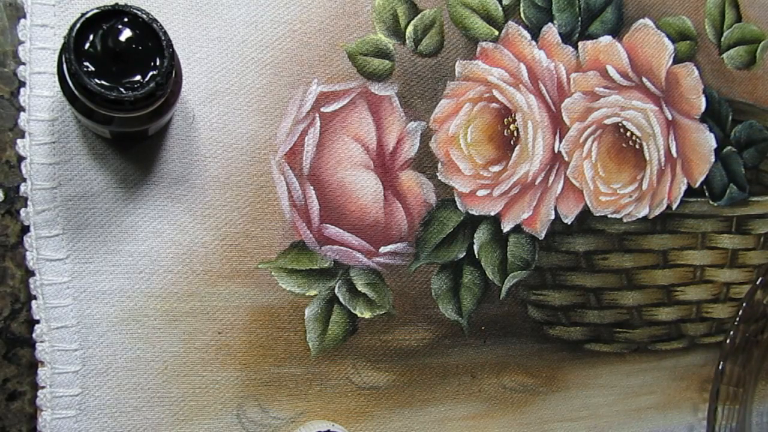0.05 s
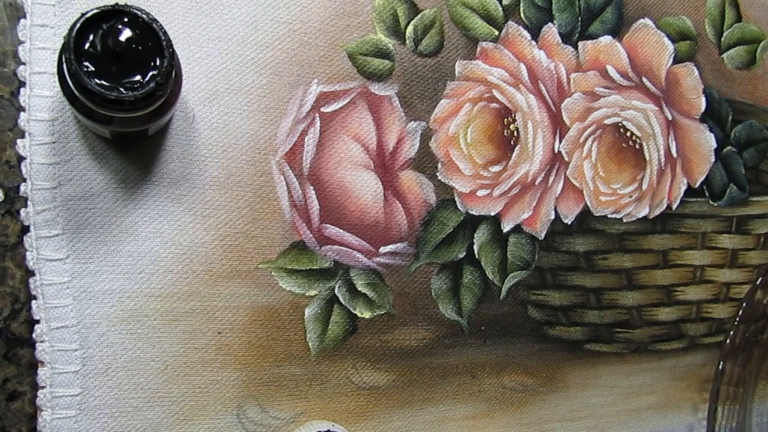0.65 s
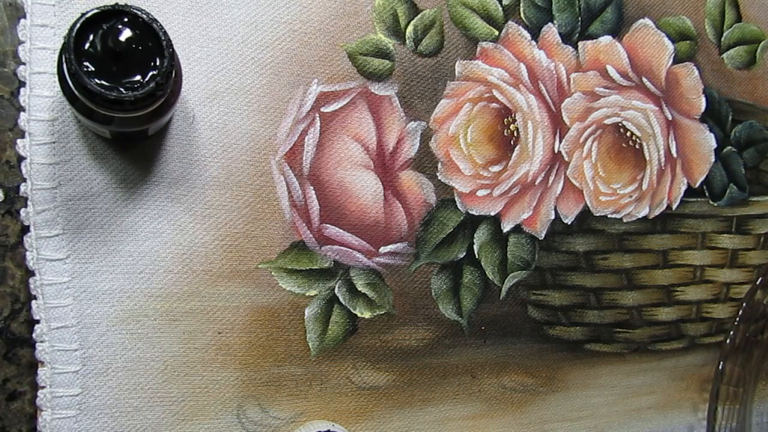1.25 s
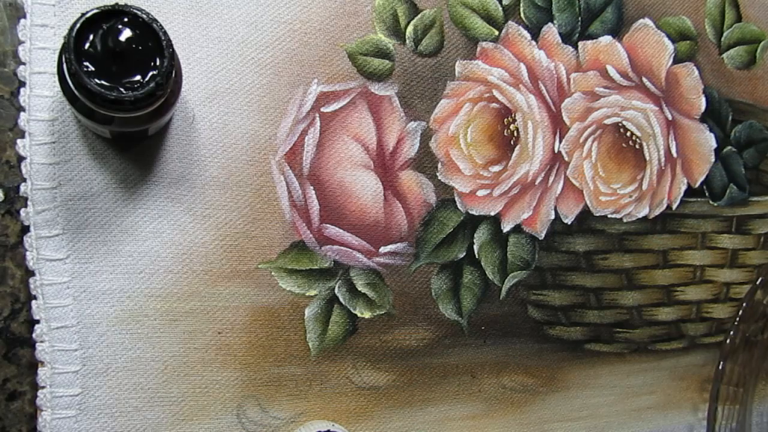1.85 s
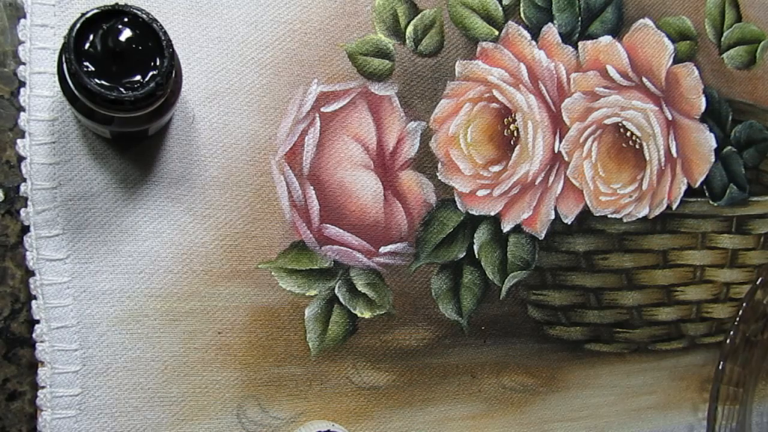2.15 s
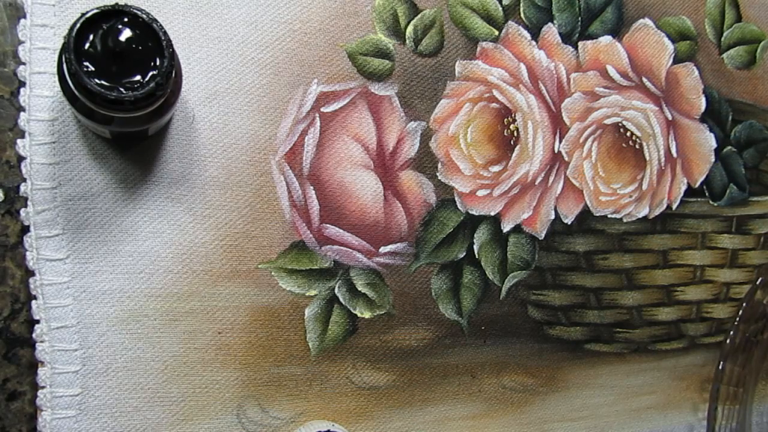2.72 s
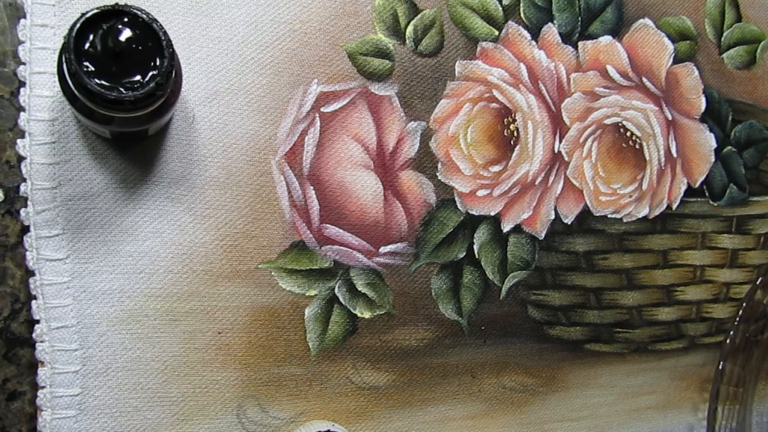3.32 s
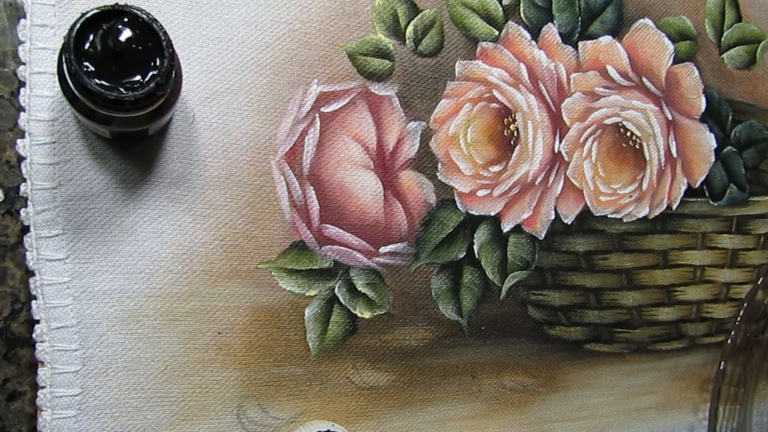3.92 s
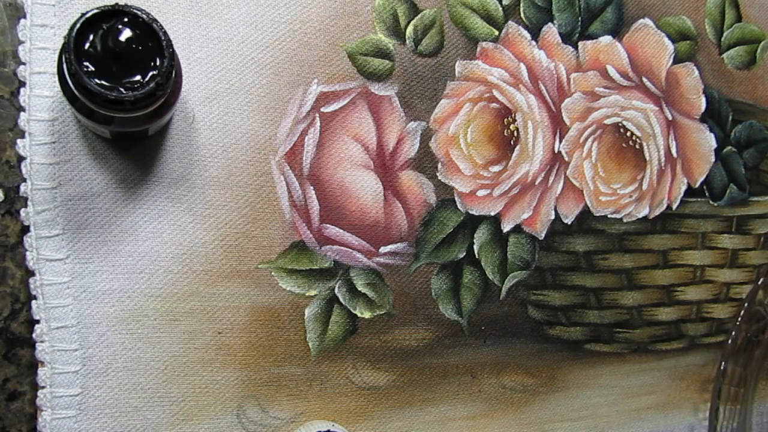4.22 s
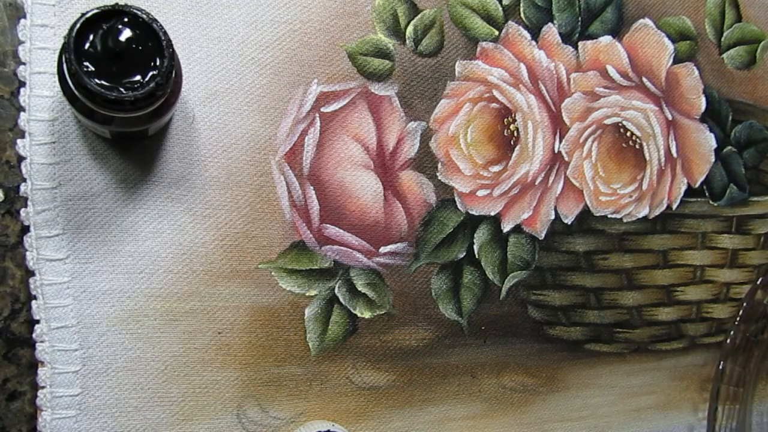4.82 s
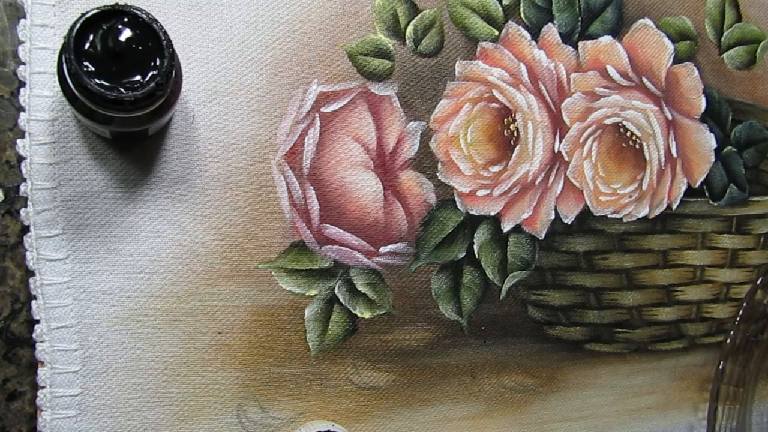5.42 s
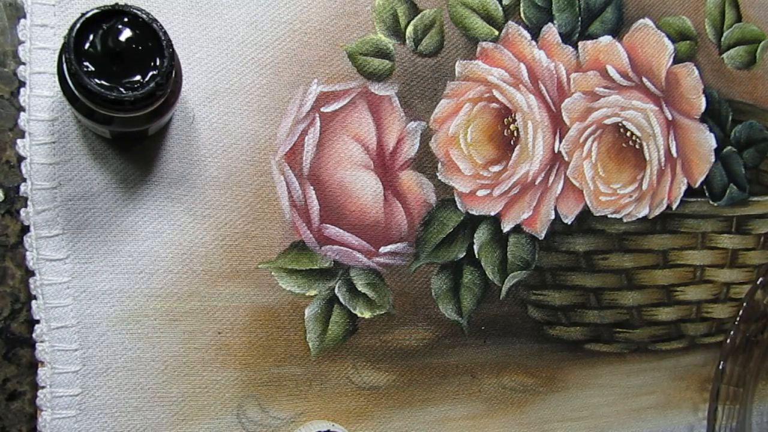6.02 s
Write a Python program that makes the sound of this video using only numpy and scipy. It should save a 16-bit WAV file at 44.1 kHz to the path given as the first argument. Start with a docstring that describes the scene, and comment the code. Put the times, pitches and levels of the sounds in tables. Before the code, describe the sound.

In a small, bare room, a paint jar scrapes softly over cloth. A brush handle knocks, then the plastic jar and lid clatter and snap against the table, and the lid is set down. Light ticks and faint, squeaky bristle strokes follow, before a seal opens with a small hollow pop. The handling sounds close, with a short echo, over low rumble, faint hum and a distant insect.

```python
"""Paint jar and brush handled on a table in a small, bare room. Throughout: low rumble, faint hum, a distant
insect. The jar scrapes over cloth, the brush ticks on it; a faint low tone swells and fades. The brush handle
knocks; plastic jar and lid clatter and snap, thudding on the table; a second jar is set down. One more shove,
light ticks, then bristles rub and squeak. Last, a seal parts with a small hollow pop, and one tick follows.
Each blow rings the modes of the struck object; the walls echo all handling."""
import sys
import numpy as np
from scipy import signal
from scipy.fft import rfft, irfft, next_fast_len
from scipy.io import wavfile
from scipy.ndimage import uniform_filter1d

SR = 44100
rng = np.random.default_rng(int(sys.argv[2]) if len(sys.argv) > 2 else 0)


def store_pcm(level_fs):
    """Save levels as 16-bit WAV."""
    pcm = np.round(np.clip(level_fs, -1, 1) * 32767).astype(np.int16)
    wavfile.write(sys.argv[1], SR, np.atleast_2d(pcm).T)


N = 271656
TIME_S = np.arange(N) / SR
LEVEL_WINDOW_S = .005  # blow and pop levels: rms with all energy in this window

# room noise: (frequency [Hz], mid density [dB/Hz], side density [dB/Hz])
RUMBLE_SPECTRUM = [(25, -99, -85), (40.8, -87.5, -91.5), (62.4, -80.5, -69.5), (199, -77.5, -69.5),
                   (323, -83, -74), (541, -84.5, -79), (680, -100, -104), (762, -89.5, -87),
                   (1130, -91, -88), (2460, -101, -102), (3830, -105, -107), (7250, -105, -105),
                   (13000, -108, -106), (16700, -111, -106)]
# hum: (frequency [Hz], level [dB])
HUM_TONES = [(59.5, -69), (375, -66.5), (506, -69), (571, -71)]

# jar shoved over cloth: (peak time [s], rise [s], fall [s], scrape [dB], body [dB])
JAR_SHOVES = [(.04, 0.21, 0.28, -58.5, -84), (.22, 0.12, .13, -56, -82), (.41, 0.23, .16, -61.5, -82),
              (.645, 0.076, 0.33, -56, -78), (.745, .06, 0.034, -56, -50), (.772, 0.042, 0.063, -53, -45.5),
              (2.385, 0.066, 0.054, -50, -78), (3.085, .11, 0.065, -78, -54)]
# rubbed jar and squeaking bristles: (frequency [Hz], width [Hz], gain [dB])
JAR_BODY_PEAKS = [(1125, 55, 1), (1440, 160, 6.5), (1890, 510, -5), (3800, 340, -3.5)]
SQUEAK_OUT_PEAKS = [(2048, 20, 3), (3300, 36, -7), (4140, 32, -2), (5040, 53, 0), (6340, 91, -8),
                    (6940, 57, -3.5)]
SQUEAK_BACK_PEAKS = [(3330, 26, 15), (5500, 190, -24)]
# friction and echo spectra: (frequency [Hz], gain [dB])
SCRAPE_SPECTRUM = [(500, -38), (1200, 0), (4500, 3.5), (7000, 1), (10000, 0), (16000, -6.5)]
BRISTLE_SPECTRUM = [(2000, -25), (5000, -11), (8000, -7.5), (10500, -1.5), (12500, -6), (13500, -7),
                    (16000, -9)]
WALL_SPECTRUM = [(100, -9.5), (350, 3.5), (680, -7), (900, 6), (1500, 0.5), (3500, -4.5), (6500, -5),
                 (10000, -5), (16000, -4.5)]
# echo decay: (frequency [Hz], T60 [s])
WALL_DECAY = [(200, 0.51), (1700, 0.56), (4000, 0.53), (8000, 0.44), (16000, 0.28)]
# stereo width of the handling: (frequency [Hz], side gain [dB])
SIDE_SPECTRUM = [(100, 7), (380, -17), (700, -17), (1300, -10), (2400, -23), (4400, -13.5), (8100, -6),
                 (11000, -5), (13500, -1)]

# blows: (time [s], level [dB], contact [s], low shelf [dB], treble edge [Hz], room send [dB])
BRUSH_TICKS = [(.2375, -48.5, 0.0021, 24, 8000, -1.5), (.3765, -47.5, 0.00087, 10, 15000, -5),
               (.775, -43, 0.0029, 21, 14000, -1.5), (3.0085, -53, 0.0018, 0, 9000, -4),
               (3.078, -52, 0.001, -7, 9250, -5), (3.1415, -53.5, 0.0025, 3, 8000, 3),
               (3.336, -61, .002, -2, 14000, 6), (4.565, -57, .003, -11, 15000, -3),
               (5.607, -58, .003, 3, 12000, -5)]
HANDLE_KNOCKS = [(1.4312, -26, 0.0015, -3, 4040, -3.5), (1.5925, -36.5, 0.0015, -6, 9800, 0),
                 (1.6395, -31.5, 0.0014, -4, 11300, 0.5), (1.9135, -40.5, 0.0016, 9, 4430, 0.5),
                 (1.9555, -36, .003, 6, 4400, -4.5)]
JAR_CLICKS = [(1.8935, -27.5, 0.0033, 1.5, 12000, 1), (1.903, -27.5, 0.0018, -6, 6370, -24),
              (1.9133, -20, 0.0021, 0.5, 12100, -2), (1.9312, -34, 0.0014, -13, 13000, -4),
              (1.9348, -22.5, 0.0031, -5.5, 10000, 0.5), (1.9475, -27, .0006, -23, 8050, -9),
              (2.3921, -15.5, 0.0018, -8, 14600, -0.5), (2.410, -26.5, 0.0038, -5, 13000, -10),
              (2.4197, -26.5, 0.0044, -1, 8100, -1.5), (2.7435, -45.5, 0.00064, -22, 7900, -1.5),
              (2.7765, -53, .001, -7, 9400, 2)]
SECOND_JAR_SET_DOWN = [(2.5985, -26.5, 0.0031, -2, 14700, 1)]
# modes of struck objects: (frequency [Hz], relative energy [dB], T60 [s])
JAR_MODES = [(850, -11.5, 0.067), (1250, -9, .014), (1600, -13.5, 0.0058), (2260, -24, 0.012),
             (3470, -10, 0.022), (5600, -5, 0.0088), (6700, 0, 0.026), (6930, -4.5, 0.013),
             (8470, -1, 0.011), (7770, -5.5, 0.014), (9300, 0.5, 0.0051), (9850, 2.5, 0.01),
             (10390, 5.5, 0.012), (12300, -11, 0.0055), (14200, -11, 0.0062)]
HANDLE_MODES = [(527, -8.5, 0.064), (1027, -0.5, 0.055), (1320, 3, 0.068), (1610, -7.5, 0.021),
                (1930, -5, 0.0083), (1990, -11, 0.016), (2170, -6.5, .008), (3210, -10.5, 0.015),
                (4370, -8, 0.021), (6800, -14, 0.0081), (9840, -8.5, .004)]
TABLE_MODES = [(110, -5.5, 0.032), (168, -5.5, 0.036), (266, -2.5, 0.025), (348, -1, 0.051),
               (486, -6, 0.028), (828, -1.5, 0.051)]
SECOND_JAR_MODES = [(845, 4.5, 0.046), (1240, -0.5, 0.017), (1813, 5, 0.04), (2050, -4, 0.015),
                    (2700, -14, 0.0095), (3300, -8, 0.032), (4770, -12, 0.0092), (6200, -2, 0.015),
                    (8400, -8, 0.016), (10240, 2, 0.015), (12600, -7, .01)]
# onset cracks: (frequency [Hz], gain [dB])
JAR_CRACK_SPECTRUM = [(150, -9), (700, -7), (1500, -1.5), (2600, -2), (4200, -4.5), (6500, 0.5),
                      (10500, 2.5), (13000, 1.5), (16000, -19)]
HANDLE_CRACK_SPECTRUM = [(300, -36), (700, -2), (1050, -3), (2000, 2.5), (2800, -2), (5000, -2),
                         (10000, -10), (16000, -16)]
SECOND_JAR_CRACK_SPECTRUM = [(200, -11), (800, -7), (2200, 4), (4000, -6.5), (7000, -2), (11000, -6.5),
                             (16000, -14)]
SEAL_CRACK_SPECTRUM = [(600, -55), (1100, -28), (1350, 7), (2200, -2.5), (2700, -13.5), (3500, -4.5),
                       (4200, 2), (4800, -9.5), (5300, 0), (6000, -11.5), (9000, -13), (16000, -28)]
# jar's weight landing on the table: (time [s], peak [dB])
TABLE_THUDS = [(1.9132, -41), (1.935, -40), (2.3938, -37.5), (2.419, -38)]

# brush strokes: (start [s], hold [s], release [s], hiss [dB], squeak re hiss [dB], direction)
BRUSH_STROKES = [(3.724, 0.038, .04, -56.5, -1.5, "out"), (3.826, 0.1, 0.53, -56.5, -5, "out"),
                 (4.22, 0.061, .28, -57.5, -7, "back")]
# bristle tufts springing free: (time [s], level [dB])
TUFT_FLICKS = [(3.807, -53), (3.875, -51.5), (3.93, -46), (3.9752, -44.5), (4.038, -54), (4.125, -51),
               (4.174, -52), (4.41, -60)]


def undb(db):
    """Decibels to gain."""
    return 10 ** (np.asarray(db) / 20)


def unit(x):
    """Scale each channel to rms 1."""
    return x / np.sqrt(np.mean(x ** 2, axis=-1, keepdims=True))


def curve_at(points, hz):
    """Interpolate (frequency [Hz], value) points over log frequency."""
    points_hz, values = np.transpose(points)
    return np.interp(np.log(hz + 1), np.log(points_hz), values)


def colour(x, spectrum):
    """Minimum-phase filter through (frequency [Hz], gain [dB]) points."""
    size = next_fast_len(x.shape[-1] // 2 + 2048) * 2
    gain = undb(curve_at(spectrum, np.fft.rfftfreq(size, 1 / SR)))
    cepstrum = irfft(np.log(gain))
    cepstrum[1:size // 2] *= 2
    cepstrum[size // 2 + 1:] = 0
    return irfft(rfft(x, size) * np.exp(rfft(cepstrum)))[..., :x.shape[-1]]


def resonate(x, peaks):
    """Parallel resonators; rms 1."""
    return unit(sum(undb(db) * signal.lfilter(*signal.iirpeak(hz, hz / width_hz, fs=SR), x)
                    for hz, width_hz, db in peaks))


def drift(rate_hz):
    """Smooth random drift, spread near 1."""
    step = int(SR / rate_hz)
    stairs = np.repeat(rng.standard_normal(N // step + 1), step)
    return 1.222 * uniform_filter1d(stairs, step)[:N]


def sine(hz):
    """Sine following a per-sample frequency."""
    return np.sin(2 * np.pi * np.cumsum(hz) / SR)


def swell(peak_s, rise_s, hold_s, fall_s):
    """Gain reaching 1 at peak_s; rise and fall are times per 20 dB."""
    before = np.maximum(peak_s - TIME_S, 0) / rise_s
    after = np.maximum(TIME_S - peak_s - hold_s, 0) / fall_s
    return undb(-20 * (before + after))


def add(track, time_s, sound):
    """Mix a sound in at time_s."""
    start = int(time_s * SR)
    track[..., start:start + sound.shape[-1]] += sound[..., :N - start]


def room_tone():
    """Steady low rumble and faint wavering hum; mid, side."""
    spectrum = np.array(RUMBLE_SPECTRUM)
    out = np.array([colour(rng.standard_normal(N), spectrum[:, [0, k]]) for k in (1, 2)])
    out *= np.sqrt(SR / 2)
    out[0] += sum(undb(db + 2 * drift(4.3)) * unit(sine(hz + 2.48 * drift(9))) for hz, db in HUM_TONES)
    return out


def insect(hz, width_hz, level_db, chirp_hz, depth_db, side_db):
    """Distant insect: uneven chirps, blurred on the way to a noise band; mid, side."""
    band = [(hz, width_hz, 0)]
    rasp = resonate(resonate(rng.standard_normal((2, N)), band), band)
    beat = sine(chirp_hz * (1 + .15 * drift(5)))
    chirps = unit(undb(depth_db * beat + 0.84 * drift(10)))
    return rasp * chirps * undb([[level_db], [level_db + side_db]])


def friction(rate_hz, spread_db):
    """Dense tiny slips of uneven size; mid, side."""
    slips = (rng.random((2, N)) < rate_hz / SR) * rng.standard_normal((2, N))
    size_db = spread_db * np.minimum(rng.exponential(size=N), 5)
    return unit(slips * undb(size_db))


def jar_slide(room_db):
    """Jar scrapes over cloth; pressed harder, its body sounds too. Returns direct, room send."""
    slips = friction(rate_hz=7700, spread_db=2.5)
    scrape = unit(colour(slips, SCRAPE_SPECTRUM))
    body = resonate(slips, JAR_BODY_PEAKS)
    out = sum(swell(peak_s, rise_s, 0, fall_s) * (undb(scrape_db) * scrape + undb(body_db) * body)
              for peak_s, rise_s, fall_s, scrape_db, body_db in JAR_SHOVES)
    return out, undb(room_db) * out[0]


def wall_echoes(send, first_s, build_s, size=32768):
    """Echoes build after the first reflection and decay, treble first; mid, side."""
    t, hz = np.arange(size) / SR, np.fft.rfftfreq(size, 1 / SR)
    noise_bins = rfft(rng.standard_normal((2, size)))
    centres_hz = np.geomspace(200, 16000, 8)
    tail = 0
    for centre_hz, weights in zip(centres_hz, np.eye(len(centres_hz))):
        band = irfft(noise_bins * curve_at(np.c_[centres_hz, weights], hz))
        tail = tail + band * np.exp(-np.log(1000) * t / curve_at(WALL_DECAY, centre_hz))
    tail *= 1 - np.exp(-np.maximum(t - first_s, 0) / build_s)
    tail = colour(tail / np.linalg.norm(tail[0]), WALL_SPECTRUM)
    return signal.fftconvolve(send[None], tail, axes=1)[:, :N]


def ring(modes, t, detune=0):
    """Decaying modes, weighted by energy; neighbours alternate in sign."""
    return sum((-1) ** k * undb(db) / np.sqrt(t60_s) * np.exp(-np.log(1000) * t / t60_s)
               * np.sin(2 * np.pi * hz * (1 + detune * rng.standard_normal()) * t)
               for k, (hz, db, t60_s) in enumerate(modes))


def blows(events, modes, crack_spectrum, chatter, crack_db, scatter_db, split_hz, size=4096):
    """A push and brief contact chatter ring the modes, with a crack. Returns direct, room send."""
    direct, send, t = np.zeros((2, N)), np.zeros(N), np.arange(size) / SR
    push = signal.unit_impulse(size)
    for time_s, level_db, contact_s, low_db, edge_hz, room_db in events:
        contact = (1 - np.exp(-t / 0.0006)) ** 2 * np.exp(-t / contact_s)
        grit = unit(rng.standard_normal((2, size)) * contact)
        tone = ring(modes, t, detune=0.00207)
        force = chatter * grit / np.sqrt(size) + [push, 0 * push]  # push in mid only
        body = unit(signal.fftconvolve(force, tone[None], axes=1)[:, :size])
        near = body + undb(crack_db) * unit(colour(grit, crack_spectrum))
        # every face radiates to the walls: an even, dense crack
        far = unit(tone) + undb(scatter_db) * unit(colour(push, crack_spectrum))
        # each blow has its own bass weight and treble edge, from dull knock to bright tick
        tilt = [(split_hz / 2, low_db), (split_hz, 0),
                (max(edge_hz, split_hz + 1), 0), (1.18 * edge_hz, -13)]
        gain = undb(level_db) * np.sqrt(LEVEL_WINDOW_S * SR / size)
        sound = gain * unit(colour(np.vstack([near, far]), tilt))
        add(direct, time_s, sound[:2])
        add(send, time_s, sound[2] * undb(room_db))
    return direct, send


def drone(peak_s, hz, level_db, rise_s, hold_s, fall_s):
    """Faint, slightly unsteady low tone: swells, holds, fades."""
    return undb(level_db) * swell(peak_s, rise_s, hold_s, fall_s) * unit(sine(hz + drift(13)))


def table_thuds(room_db):
    """Table top booms briefly under the jar's weight. Returns direct, room send."""
    out = np.zeros(N)
    boom = ring(TABLE_MODES, np.arange(SR // 5) / SR)
    for time_s, peak_db in TABLE_THUDS:
        add(out, time_s, undb(peak_db) * boom / np.abs(boom).max())
    return np.array([out, np.zeros(N)]), undb(room_db) * out


def bristle_rub(attack_s, squeak_fade_db_per_s, flutter_db, flick_s, room_db):
    """Bristles slip past each other and squeak, pitch set by direction. Returns direct, room send."""
    slips = friction(rate_hz=12000, spread_db=2.5)
    hiss = unit(colour(slips, BRISTLE_SPECTRUM))
    squeaks = {"out": resonate(slips, SQUEAK_OUT_PEAKS), "back": resonate(slips, SQUEAK_BACK_PEAKS)}
    strokes = 0
    for start_s, hold_s, release_s, hiss_db, squeak_db, direction in BRUSH_STROKES:
        pressure = undb(hiss_db) * swell(start_s + attack_s, attack_s, hold_s, release_s)
        fade_db = squeak_fade_db_per_s * np.maximum(TIME_S - start_s, 0)  # bristles lie down
        squeak = undb(squeak_db - fade_db) * squeaks[direction]
        strokes = strokes + pressure * (hiss + squeak)
    flicks = sum(undb(db) * swell(time_s, flick_s / 10, 0, flick_s) for time_s, db in TUFT_FLICKS)
    out = strokes * undb(flutter_db * drift(90)) + hiss * flicks
    return out, undb(room_db) * out[0]


def seal_pop(time_s, level_db, hz, glide, glide_s, rise_s, hold_s, t60_s,
             crack_db, scatter_db, room_db, side_db, size=4096):
    """A seal cracks open; inrushing air rings a small hollow, pitch sinking. Returns direct, room send."""
    out, send, t = np.zeros(N), np.zeros(N), np.arange(size) / SR
    attack = (1 - np.exp(-t / rise_s)) ** 2
    decay = np.exp(-np.log(1000) * np.maximum(t - hold_s, 0) / t60_s)
    pitch_hz = hz * (1 + glide * np.exp(-t / glide_s))
    note = unit(attack * decay * sine(pitch_hz))
    crack = unit(colour(signal.unit_impulse(size, int(rise_s * SR)), SEAL_CRACK_SPECTRUM))
    gain = undb(level_db) * np.sqrt(LEVEL_WINDOW_S * SR / size)
    add(out, time_s, gain * (note + undb(crack_db) * crack))
    add(send, time_s, gain * undb(room_db) * (note + undb(scatter_db) * crack))
    return np.array([out, -undb(side_db) * out]), send  # negative side: to the right


def scene():
    """Handling, echoes and background, mixed as mid and side; returns left, right."""
    sources = [
        jar_slide(room_db=-1.5),
        blows(BRUSH_TICKS, JAR_MODES, JAR_CRACK_SPECTRUM,
              chatter=0.88, crack_db=24, scatter_db=9, split_hz=7600),
        blows(HANDLE_KNOCKS, HANDLE_MODES, HANDLE_CRACK_SPECTRUM,
              chatter=0.71, crack_db=-7.5, scatter_db=7.5, split_hz=4000),
        blows(JAR_CLICKS, JAR_MODES, JAR_CRACK_SPECTRUM,
              chatter=0.34, crack_db=-4, scatter_db=7, split_hz=4150),
        table_thuds(room_db=6),
        blows(SECOND_JAR_SET_DOWN, SECOND_JAR_MODES, SECOND_JAR_CRACK_SPECTRUM,
              chatter=1.5, crack_db=-5.5, scatter_db=3, split_hz=3900),
        bristle_rub(attack_s=.05, squeak_fade_db_per_s=14, flutter_db=0.5, flick_s=0.0057, room_db=-3),
        seal_pop(time_s=5.355, level_db=-16.5, hz=1686, glide=0.1, glide_s=0.0023,
                 rise_s=0.00046, hold_s=0.0037, t60_s=0.019,
                 crack_db=-16, scatter_db=-8.5, room_db=-5.5, side_db=1)]
    # each source has its own spot, so its own echoes
    handling = sum(direct + wall_echoes(send, first_s=0.00061, build_s=0.00098)
                   for direct, send in sources)
    background = room_tone()
    background += insect(hz=5804, width_hz=630, level_db=-70, chirp_hz=5.6, depth_db=5, side_db=-16)
    mid = background[0] + handling[0]
    mid += drone(peak_s=1.03, hz=173, level_db=-56, rise_s=.14, hold_s=.22, fall_s=.12)
    side = background[1] + colour(handling[1], SIDE_SPECTRUM)
    return np.array([mid + side, mid - side])


def record(dry):
    """Soft-clip the sharpest peaks, then low-pass steeply."""
    ceiling, cutoff_hz = .8, 16100
    rounded = ceiling * np.tanh(dry / ceiling)
    return signal.sosfilt(signal.ellip(10, .2, 80, cutoff_hz, fs=SR, output="sos"), rounded)


dry = scene()
out = record(dry)
store_pcm(out)
```